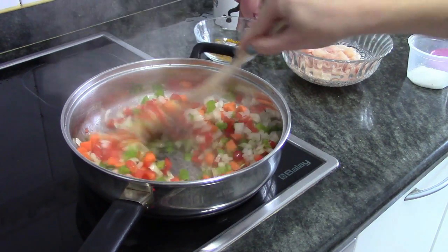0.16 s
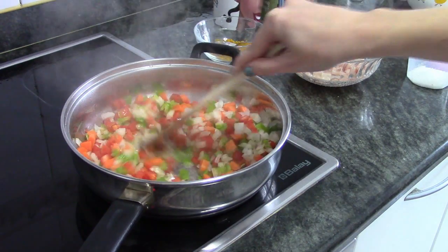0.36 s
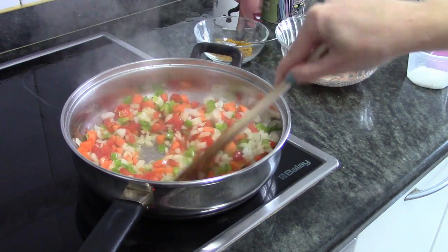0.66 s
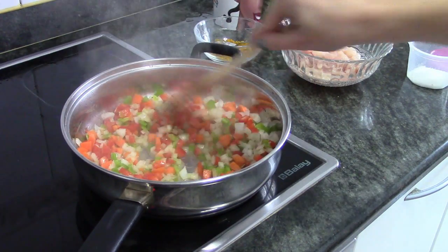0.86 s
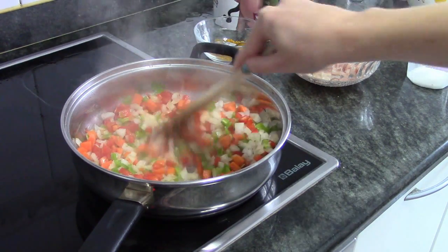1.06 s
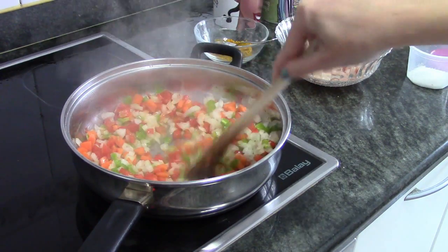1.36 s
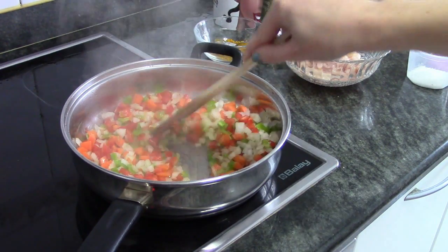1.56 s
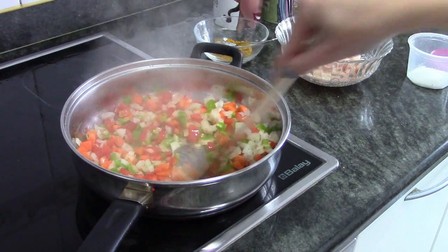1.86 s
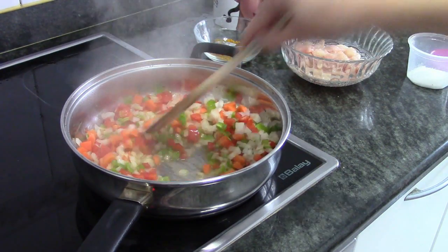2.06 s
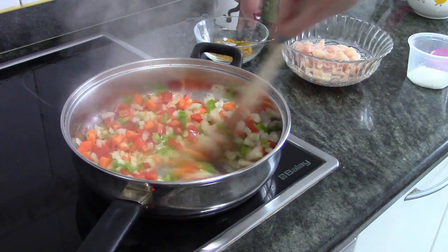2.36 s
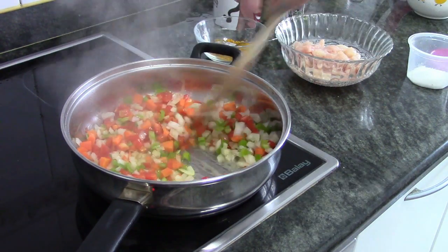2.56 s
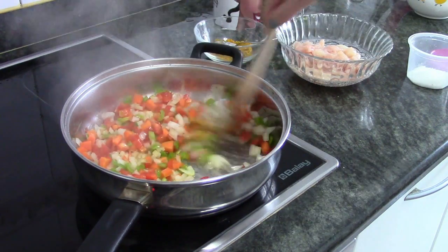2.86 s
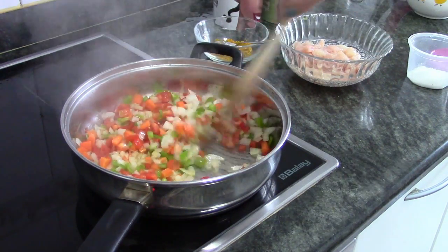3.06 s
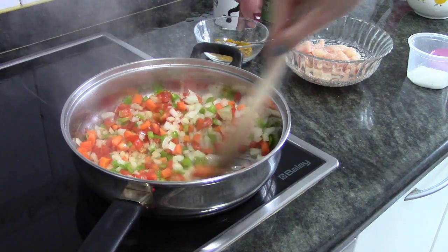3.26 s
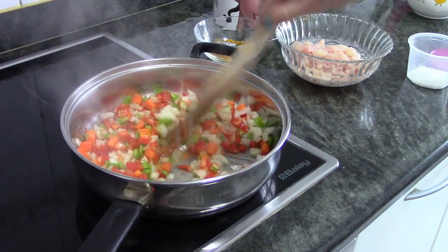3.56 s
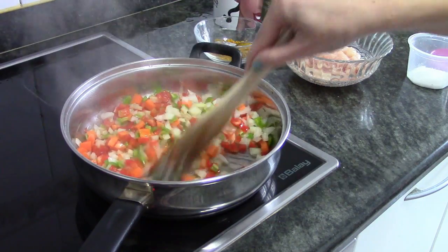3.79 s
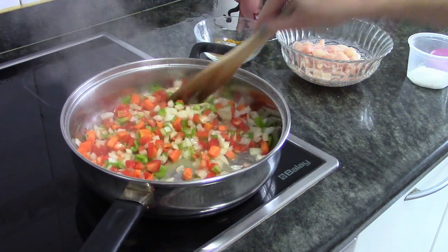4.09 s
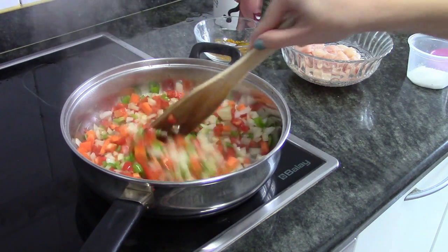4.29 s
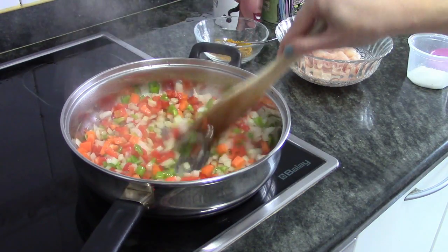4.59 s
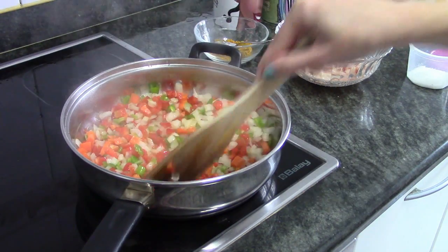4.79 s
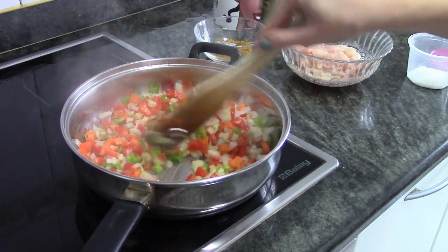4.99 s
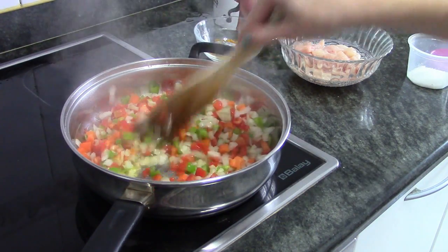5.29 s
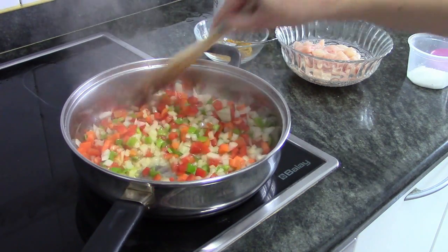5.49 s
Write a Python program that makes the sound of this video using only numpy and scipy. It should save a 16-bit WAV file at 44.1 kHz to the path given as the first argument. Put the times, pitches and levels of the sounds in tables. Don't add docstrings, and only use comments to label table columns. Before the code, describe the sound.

Diced vegetables sizzle densely in hot oil in a steel pan while a wooden spoon stirs, scrapes and knocks, with sharp water spits.

```python
import sys
import numpy as np
from scipy import signal
from scipy.fft import rfft, irfft
from scipy.io import wavfile
from scipy.ndimage import uniform_filter1d

SR = 44100
rng = np.random.default_rng(int(sys.argv[2]) if len(sys.argv) > 2 else 0)


def waveform_to_disk(signal):
    frames = np.transpose(np.atleast_2d(signal))
    scaled = np.clip(frames, -1, 1) * 32767
    samples = np.round(scaled).astype(np.int16)
    wavfile.write(sys.argv[1], SR, samples)


def volts(x):
    e = np.asarray(x, float) / 20
    return 10 ** e


N = 248724

# (frequency [Hz], density [dB])
SIZZLE_SPECTRUM = [(200, -29), (600, -30), (780, -10.5), (1000, -6.5), (1500, -3.5), (2650, 0), (4000, -1),
                   (5140, -1.5), (6200, 1), (7390, 2.5), (8800, -1.5), (10600, -5), (13000, -13),
                   (15500, -17)]
# (time [s], level [dB])
OIL_HEAT = [
    (0, 1.2),
    (1.3, 0.03),
    (2.4, -2.5),
    (3.5, -1.8),
    (4.6, -1.34),
    (5.64, 1.84),
]
# (middle [s], length [s], flare of bared oil [dB], sputter of turned pieces [dB],
# pressure on the steel [dB])
SPOON_STROKES = [(0.128, 0.59, 0.1, 3, -0.3), (0.42, 0.2, 0, 0.6, 0.0), (0.64, 0.22, 2, 3.5, 1),
                 (0.88, 0.47, 1.2, 3, 0), (1.374, 0.29, 1.4, 2, 2), (1.525, 0.2, 1.3, 0.5, 1.5),
                 (1.78, 0.28, 1.1, 0.5, 2.5), (2.06, 0.43, 1.3, 0.3, 1.2), (2.328, 0.5, 3, 2.5, 4),
                 (2.633, 0.6, 2.5, 2.1, 3), (2.84, 0.5, 1.3, 0.7, 1.5), (3.243, 0.98, 1.3, 1, 3.5),
                 (3.74, 0.51, 2.2, 1.2, 2.1), (4.128, 0.57, 3, 4, 4.5), (4.493, 0.5, 3, 2.5, 3.1),
                 (4.784, 0.38, 2, 3.5, 2), (5.09, 0.47, 0.0, 1.9, 1.6), (5.508, 0.55, -1, 2.5, -0.8)]
# (frequency [Hz], width [Hz], level [dB])
FLOOR_MODES = [(267, 24, -26), (324, 18, -22), (385, 40, -21), (445, 18, -11), (522, 30, -11),
               (618, 38, -16), (735, 45, -9), (810, 50, -9), (922, 30, -7), (975, 35, -4), (1090, 60, -8),
               (1160, 50, -7), (1245, 80, -3), (1330, 70, -6), (1720, 120, -8), (2230, 120, -8),
               (2560, 70, -8), (2680, 70, -4), (2890, 90, -8), (3170, 130, -5), (3750, 120, -8)]
# (time [s], bass
# modes [dB], low modes [dB], middle modes [dB], high modes [dB])
SPOON_KNOCKS = [(0.968, -50, -48, -36, -40), (2.166, -42, -28.5, -16, -36), (2.601, -39, -27, -15, -32),
                (2.81, -60, -42, -24, -22), (3.0512, -33, -23, -18, -12), (4.56, -53, -42, -34, -22),
                (4.752, -38, -33, -32, -36), (4.995, -43, -40, -40, -40), (.195, -60, -55, -40, -20),
                (.685, -60, -55, -40, -21), (1.3, -60, -55, -36, -22)]
# (frequency [Hz], level [dB], t60 [s])
RIM_MODES = [(268, -5, .3), (290, -2, .25), (324, -2, .3), (400, 2, .25), (510, 1, .3), (560, -4, .2),
             (605, -4, .2), (640, -3, .15), (690, -3, .1), (800, 0, .08), (1160, 4, .2), (1230, -1, .22),
             (2130, -6, .15), (2320, -4, .15), (2557, -2, .2), (2675, 0, .22), (2850, -4, .2),
             (3400, -8, .1), (370, 4, .06), (600, 10, .035), (950, 5, .035), (1350, 6, .035),
             (1650, 3, .04), (2220, 5, .05), (3150, 7, .05)]
UNDAMPED_SHARE = (1.23, 0.76, 0.44, 0.6)
# (time [s], peak level [dB], pitch [Hz])
WATER_DROPS = [
    (.5385, -5, 5000),
    (.5564, -1, 6700),
    (1.2148, -6, 6600),
    (2.5832, -6, 6900),
    (2.9134, -6, 7300),
    (3.348, -7, 7000),
    (3.812, -7, 7200),
    (4.674, -5, 6000),
]
# (frequency [Hz], t60 [s])
ROOM_DECAY = [(300, .25), (1500, .4), (5000, .35), (12000, .15)]
# (frequency [Hz], density [dB])
RUMBLE_SPECTRUM = [(15, -4), (40, 5), (90, 6), (150, 2.5), (230, 4), (320, -22)]
# (start [s], length [s], level [dB])
DEEP_STRETCHES = [(0.019, 0.12, -64), (0.532, 0.43, -66), (1.24, 0.128, -66), (1.476, 0.075, -67),
                  (1.709, 0.06, -69), (2.16, 0.132, -68), (2.384, 0.1, -68), (2.777, 0.31, -74),
                  (3.567, 0.07, -66), (3.747, 0.174, -70), (4.064, 0.09, -66), (4.201, 0.084, -66),
                  (4.393, 0.078, -66), (4.591, 0.03, -72), (4.804, 0.184, -70), (5.465, 0.162, -67)]
# (time [s], peak level [dB], length [s])
AIR_PUFF = (.553, -42, .007)
# (time [s], low edge [Hz], high edge [Hz])
UNRELATED_BANDS = [(.009, 5100, 6900), (.334, 5100, 6300), (.334, 6900, 9000), (1.263, 4600, 5700),
                   (1.402, 11000, 12400), (1.402, 13000, 14500), (1.472, 11700, 13100),
                   (1.611, 8900, 13100), (2.215, 5100, 6300), (2.401, 4600, 5700), (2.401, 7500, 9000),
                   (2.47, 4600, 5700), (2.47, 7500, 9000), (3.097, 13000, 14500), (3.144, 8200, 9700),
                   (3.306, 8200, 10300), (3.399, 6200, 7600), (3.887, 7500, 9700), (4.351, 5100, 6900),
                   (4.7, 4600, 5700), (4.839, 9600, 11000), (4.908, 5600, 6900), (4.908, 8900, 11700),
                   (4.978, 5100, 6900), (4.978, 7500, 9000), (5.326, 4200, 5200), (5.326, 8900, 10400),
                   (5.373, 7500, 9000), (5.466, 11000, 12400), (5.466, 13000, 15200)]


def sizzle():
    steam = 1.66 * rng.standard_normal(N)
    mix = coloured(bubbles(per_s=9000, spread_db=0.5, cycles=1.85) + steam, SIZZLE_SPECTRUM)
    hz, t, z = signal.stft(mix, SR, nperseg=256, noverlap=192)
    heat_db, flare_db, sputter_db, _ = stirring(t)
    fizz_db = -14.5 + heat_db + flare_db
    deep_db = -14 + 0.27 * heat_db + sputter_db
    fine_db = -12 + heat_db + 1.2 * flare_db
    deep = read([(4200, 1), (5400, 0)], hz)[:, None]
    fine = read([(8500, 0), (11000, 1)], hz)[:, None]
    tilt_db = deep * (deep_db - fizz_db) + fine * (fine_db - fizz_db)
    chance = rng.standard_normal((len(t), len(hz), 2)).T
    patches = evened(smoothed(chance[0], bands=7, frames=40))
    flicker = evened(smoothed(chance[1], bands=60, frames=8))
    z = z * volts(fizz_db + tilt_db + 0.49 * patches + 0.55 * flicker)
    return signal.istft(z, SR, nperseg=256, noverlap=192)[1][:N]


def bubbles(per_s, spread_db, cycles, count=24):
    bursts = rng.random(N) < per_s / SR
    size = volts(spread_db * np.minimum(rng.exponential(1, N), 6)) * bursts
    kind = rng.integers(0, count, N)
    out = np.zeros(N)
    for k, hz in enumerate(np.geomspace(600, 15000, count)):
        turns = hz * np.arange(round(4 * cycles * SR / hz)) / SR
        rising = turns * (1 + 0.0098 * turns)
        blip = np.sin(2 * np.pi * rising) * np.exp(-turns / cycles)
        out += signal.oaconvolve(size * (kind == k), blip * np.sqrt(hz / 15000))[:N]
    return evened(out)


def stirring(t):
    middle, length, *effects_db = np.transpose(SPOON_STROKES)[:, :, None]
    progress = np.clip((t - middle) / length + .5, 0, 1)
    swell = np.sin(np.pi * progress ** 0.97) ** 2
    return curves(OIL_HEAT, t) + [(db * swell).sum(0) for db in effects_db]


def pan():
    heat_db, _, sputter_db, press_db = stirring(np.arange(N) / SR)
    low_db = -6 + 1.5 * heat_db + 1.54 * press_db
    upper_db = -6 + 1.5 * heat_db + 1.78 * press_db
    top_db = -9 + 0.43 * sputter_db
    force = volts(np.array([low_db, upper_db, top_db]))
    slip_size = volts(1.8 * np.minimum(rng.exponential(1, N), 4))
    slip_now = rng.random(N) < 4000 / SR
    slips = evened(slip_size * slip_now * rng.choice([-1., 1.], N))
    out = np.zeros(N)
    for k, (hz, width, db) in enumerate(FLOOR_MODES):
        zone = int(hz > 680) + int(hz > 1600)
        shaking = np.roll(slips, 5000 * k) * force[zone]
        out += volts(db) * ring(ring(shaking, hz, 2.96 * width), hz, width)
    return out


def knocks():
    hz, mode_db, t60 = np.transpose(RIM_MODES)[:, :, None]
    out, t = np.zeros(N), np.arange(SR // 4) / SR
    zone = np.searchsorted([450, 900, 1900], hz)
    decay_db = 60 * t / (t60 * np.array(UNDAMPED_SHARE)[zone])
    spots = rng.standard_normal((len(SPOON_KNOCKS), 2, len(RIM_MODES), 1))
    for (s, *zones_db), spot in zip(SPOON_KNOCKS, spots):
        level_db = np.array(zones_db)[zone] + mode_db + 1.5 * spot[0] - decay_db
        modes = volts(level_db) * np.sin(2 * np.pi * hz * t + .7 * spot[1])
        add(out, s, modes.sum(0) * (1 - np.exp(-t / .0012)))
    return out


def spits():
    out, t = np.zeros(N), np.arange(200) / SR
    for s, db, hz in WATER_DROPS:
        add(out, s, volts(db) * np.sin(2 * np.pi * hz * t) * np.exp(-t / .0003))
    return out


def kitchen(x):
    taps = np.zeros(SR // 2)
    at = np.arange(200, len(taps) - 20, 20)
    taps[at + rng.integers(0, 20, len(at))] = rng.choice([-1., 1.], len(at))
    hz, t, z = signal.stft(taps, SR, nperseg=256)
    decay = volts(-60 * t / read(ROOM_DECAY, hz)[:, None])
    tail = signal.istft(z * decay, SR, nperseg=256)[1]
    return signal.fftconvolve(x, tail / np.linalg.norm(tail))[:N]


def rumble():
    t = np.arange(N) / SR
    hum_db = -63 + 0.98 * stirring(t)[2]
    deep_level = volts(-84) + sum(volts(db) * ((t > s) & (t < s + length)) for s, length, db in DEEP_STRETCHES)
    edge = round(.04 * SR)
    deep_level = uniform_filter1d(uniform_filter1d(deep_level, size=edge), size=edge)
    noise = coloured(rng.standard_normal(N), RUMBLE_SPECTRUM)
    deep = signal.sosfiltfilt(signal.butter(5, 90, fs=SR, output="sos"), noise)
    return volts(hum_db) * evened(noise - deep) + volts(-2.0) * deep_level * evened(deep)


def puff():
    s, db, length = AIR_PUFF
    out = np.zeros(N)
    add(out, s, volts(db) * signal.windows.hann(round(length * SR)))
    return out


def bass_cut(x, hz):
    return signal.sosfilt(signal.butter(8, hz, "high", fs=SR, output="sos"), x)


def ring(x, hz, width):
    pole = np.exp((2j * np.pi * hz - np.pi * width) / SR)
    return 2 * signal.lfilter([1 - abs(pole)], [1, -pole], x).real


def coloured(x, points):
    z, hz = rfft(x), np.fft.rfftfreq(len(x), 1 / SR)
    own = np.sqrt(uniform_filter1d(abs(z) ** 2, size=1500) + 1e-12)
    return evened(irfft(z / own * volts(read(points, hz)), len(x)))


def evened(x):
    return x / np.sqrt(np.mean(x ** 2) + 1e-20)


def smoothed(x, bands, frames):
    return uniform_filter1d(uniform_filter1d(x, size=bands, axis=0), size=frames, axis=1)


def read(points, hz):
    f, value = np.transpose(points)
    return np.interp(np.log(hz + 1), np.log(f + 1), value)


def curves(table, t):
    s, *columns = np.transpose(table)
    return [np.interp(t, s, c) for c in columns]


def add(mix, s, sound):
    part = mix[round(s * SR):][:len(sound)]
    part += sound[:len(part)]


def scene():
    blows = knocks() + spits()
    stove = sizzle() + pan() + blows + volts(-11) * kitchen(blows)
    return np.tile(bass_cut(stove, hz=252) + rumble() + puff(), (2, 1))


def swapped(x):
    out, size = np.pad(x, ((0, 0), (1024, 1024))), 2048
    hz = np.fft.rfftfreq(size, 1 / SR)
    window = signal.windows.kaiser_bessel_derived(size, 4 * np.pi)
    noises = rng.standard_normal((len(UNRELATED_BANDS), 2, size))
    for (s, lo_hz, hi_hz), noise in zip(UNRELATED_BANDS, noises):
        frame = out[:, round(s * SR):][:, :size]
        inside = (hz > lo_hz) & (hz < hi_hz)
        band = irfft(rfft(frame * window) * inside)
        fill = evened(irfft(rfft(noise * window) * inside)) * np.sqrt(np.mean(band ** 2))
        frame += window * (volts(0.5) * fill - 0.68 * band)
    return out[:, 1024:-1024]


def top_dropped(x, edge_hz=15480, share=.89):
    hz, t, z = signal.stft(x, SR, nperseg=2048, noverlap=1024)
    top = hz > edge_hz
    mood = smoothed(rng.standard_normal((len(t), top.sum())).T, bands=4, frames=3)
    z[:, top] *= volts(4) * (mood > np.quantile(mood, share))
    return signal.istft(z, SR, nperseg=2048, noverlap=1024)[1][:, :N]


def roll_off(x):
    return signal.sosfilt(signal.butter(12, 15740, fs=SR, output="sos"), x)


def record(dry):
    limited = np.clip(dry, -.88, .88)
    finished = top_dropped(swapped(limited))
    return roll_off(finished)


dry = scene()
out = record(dry)
waveform_to_disk(out)
```